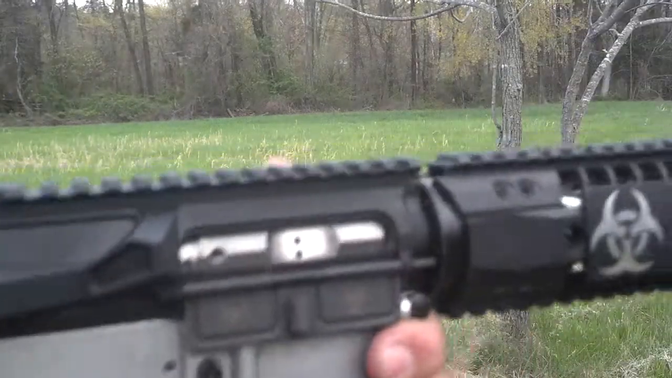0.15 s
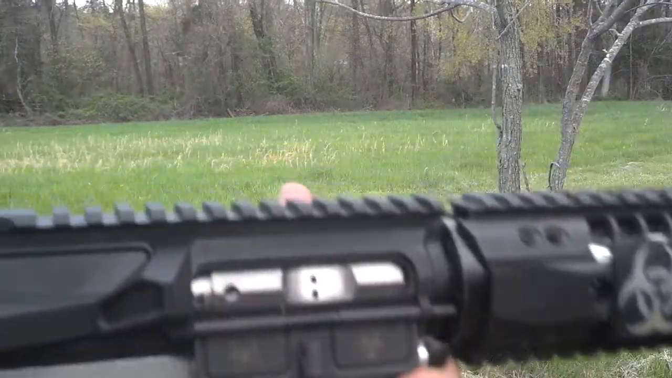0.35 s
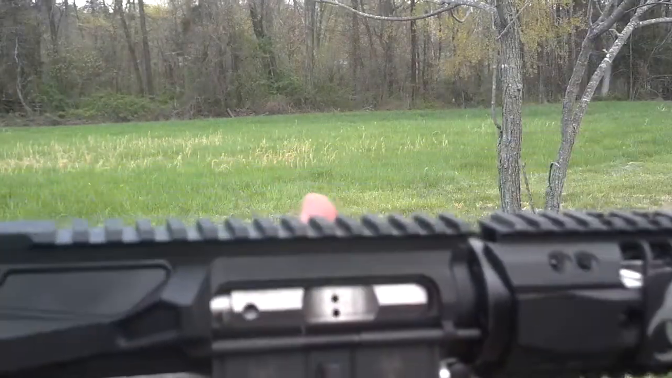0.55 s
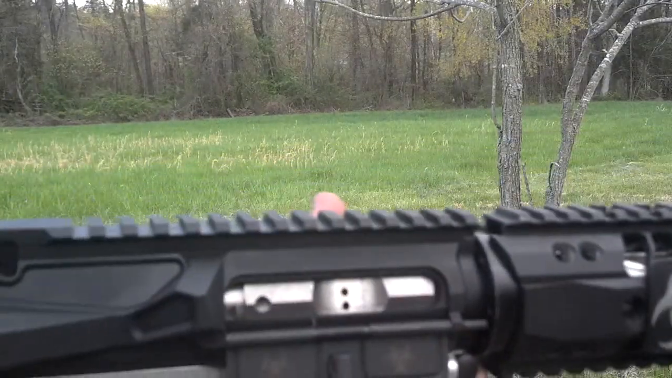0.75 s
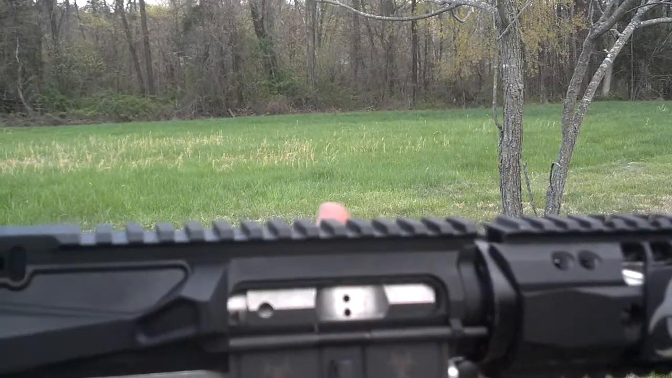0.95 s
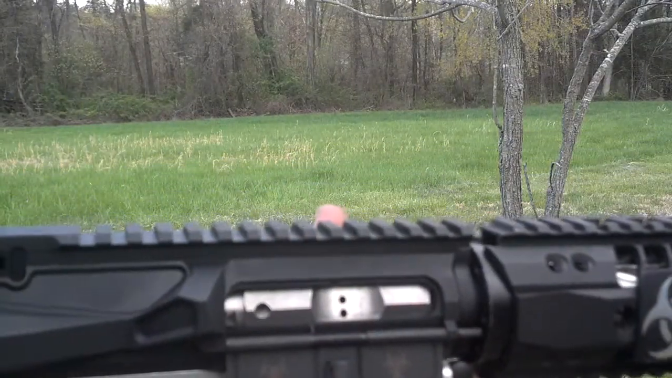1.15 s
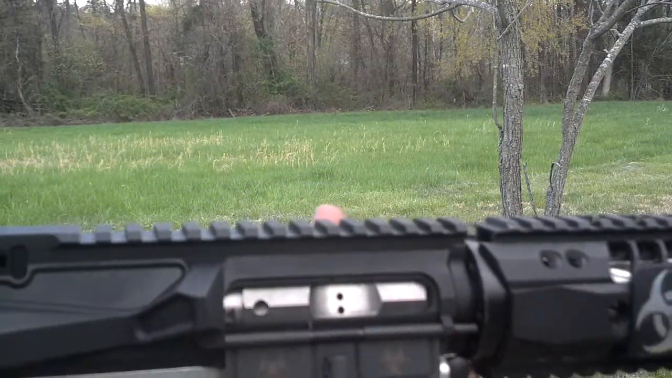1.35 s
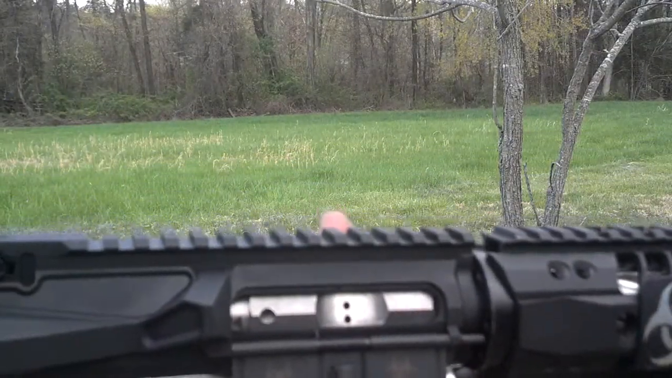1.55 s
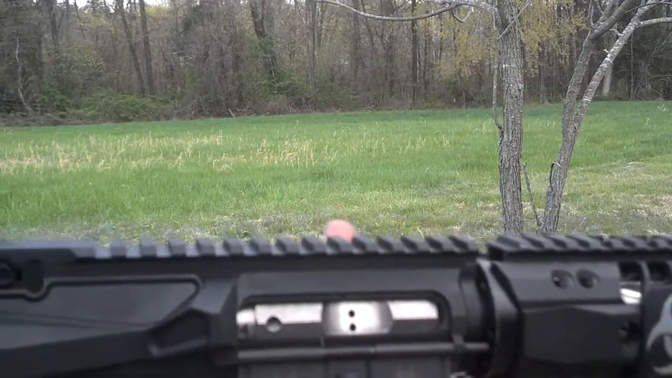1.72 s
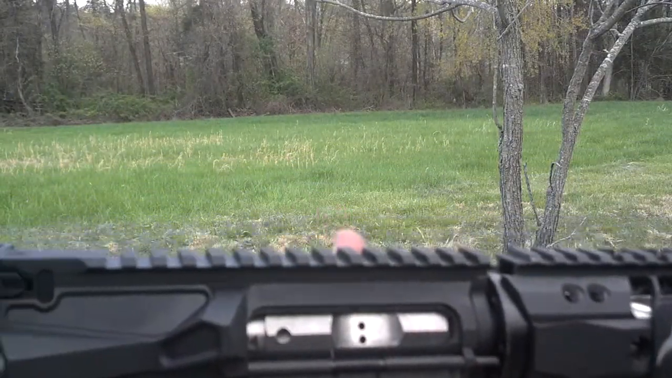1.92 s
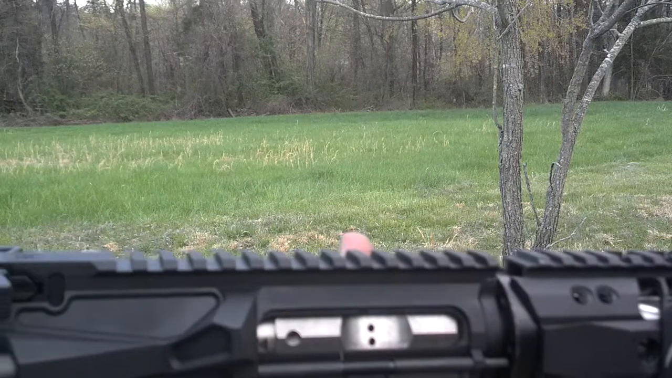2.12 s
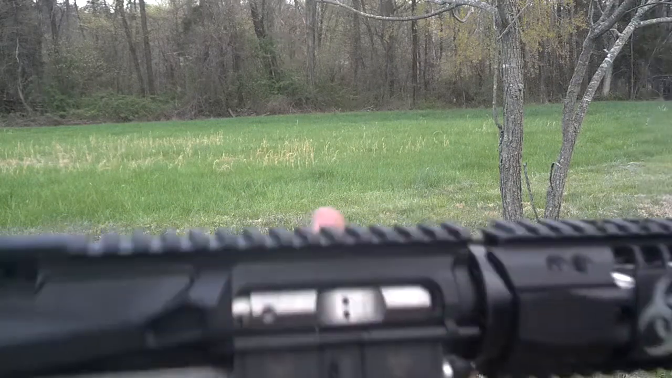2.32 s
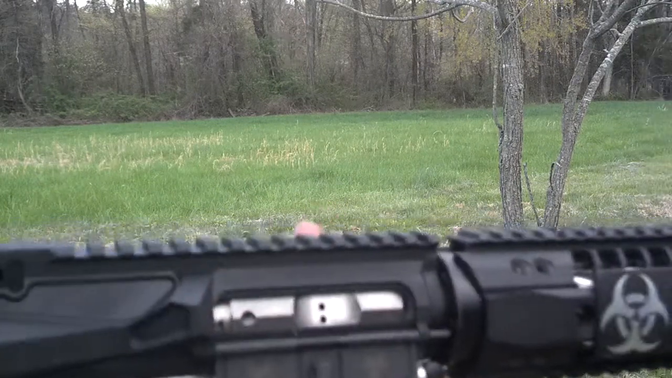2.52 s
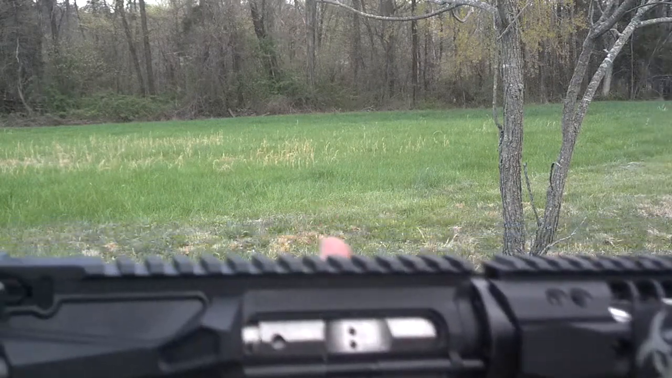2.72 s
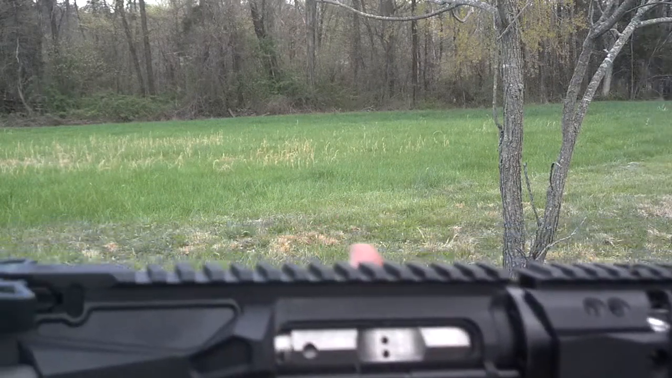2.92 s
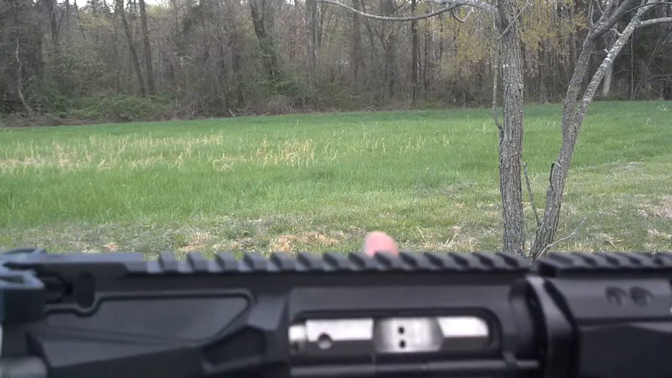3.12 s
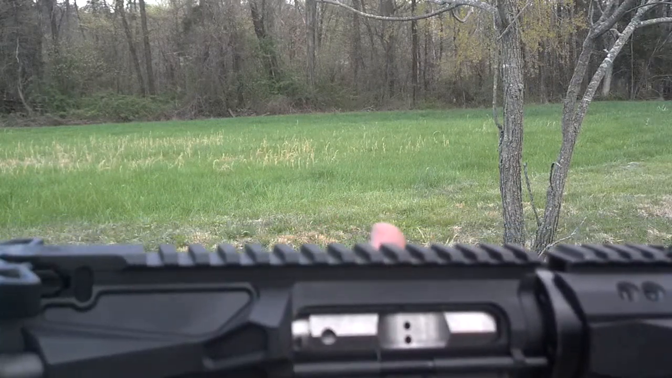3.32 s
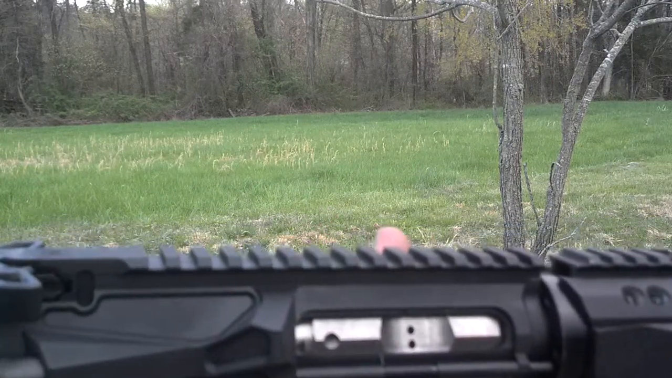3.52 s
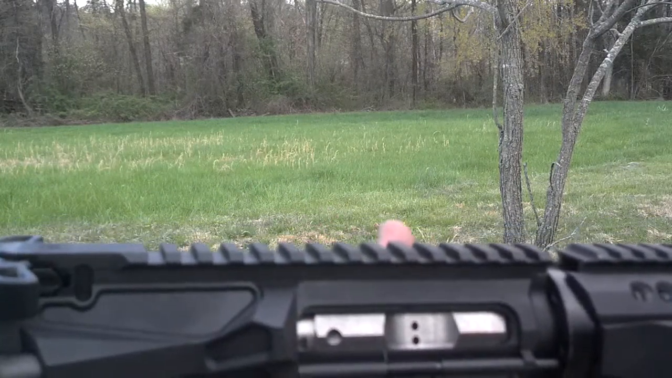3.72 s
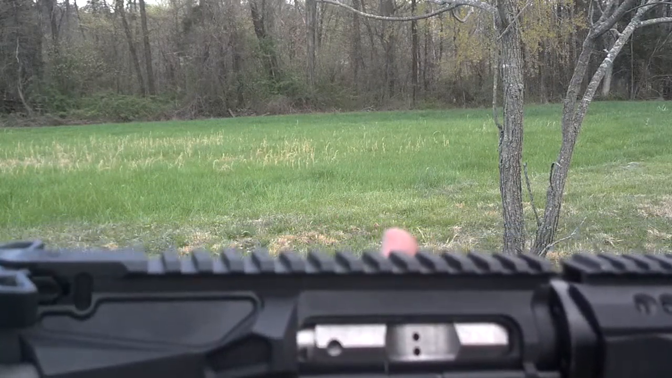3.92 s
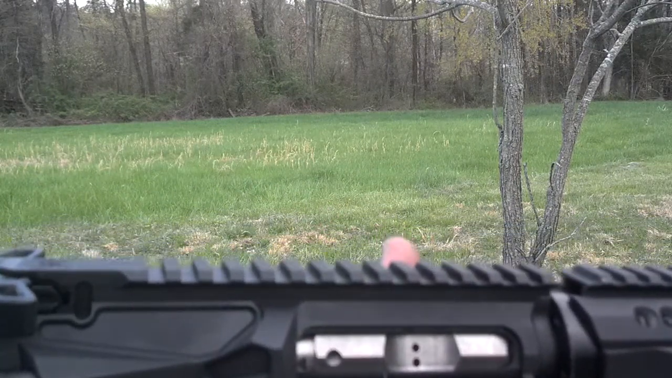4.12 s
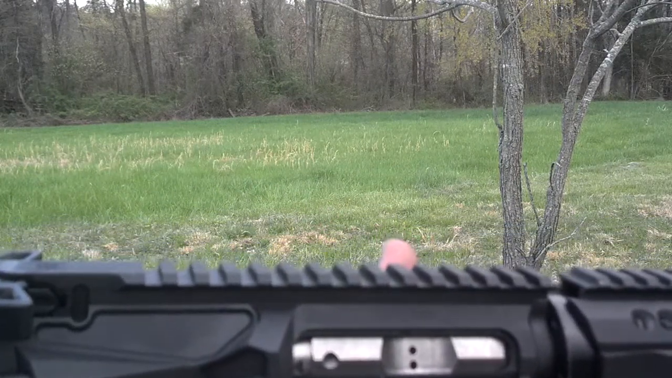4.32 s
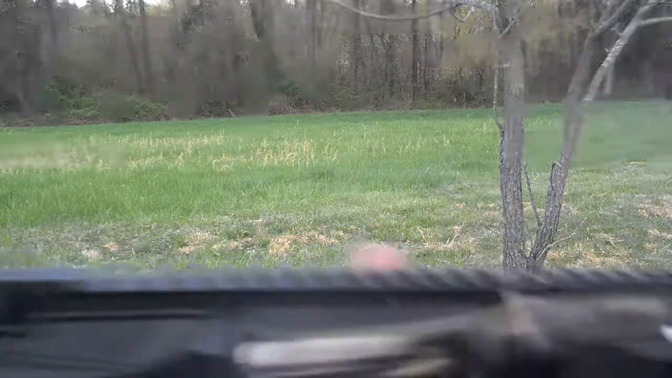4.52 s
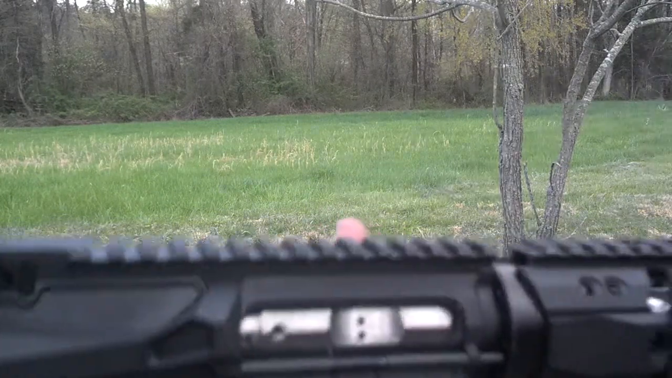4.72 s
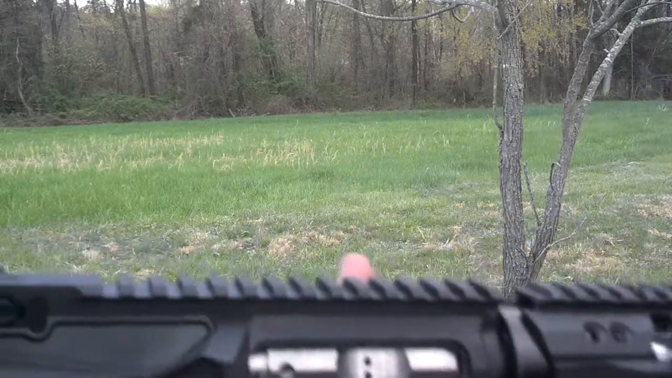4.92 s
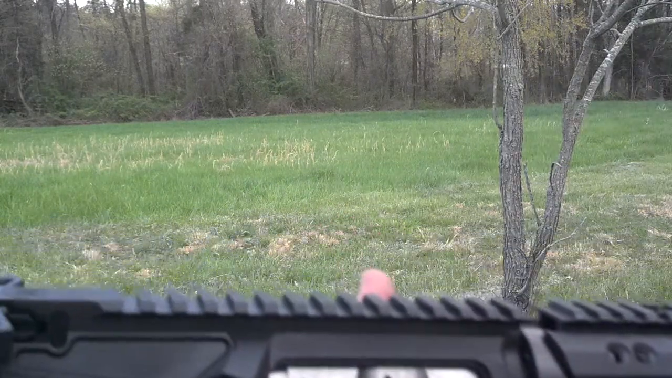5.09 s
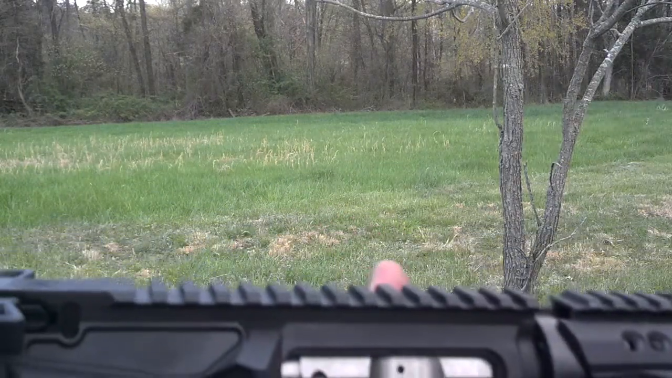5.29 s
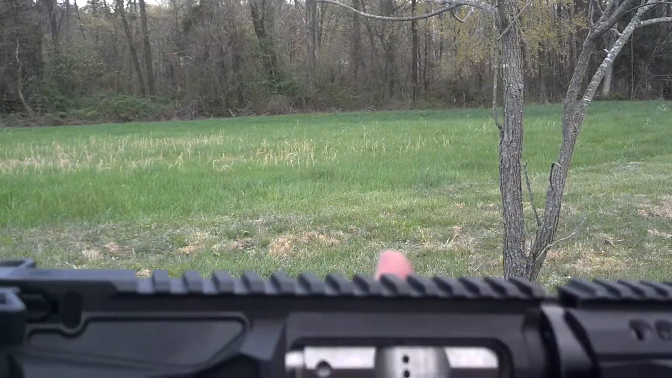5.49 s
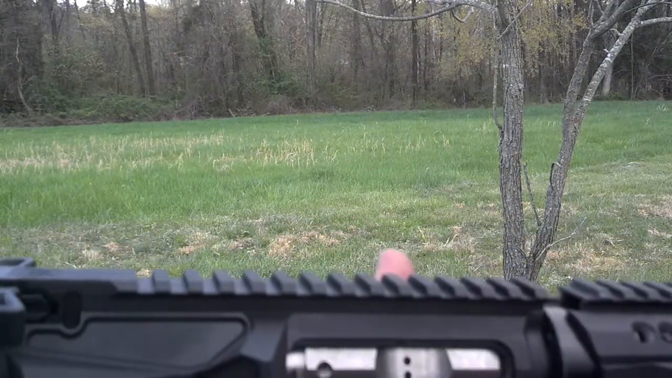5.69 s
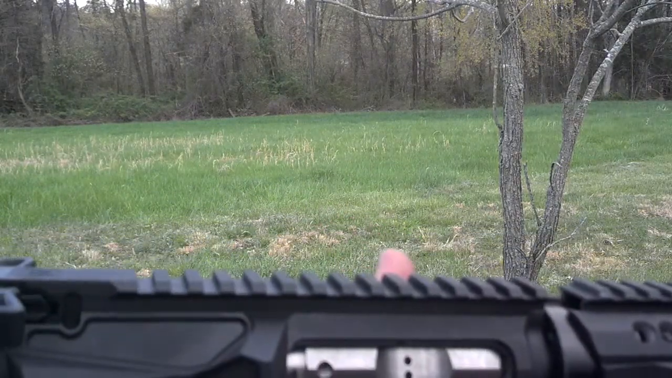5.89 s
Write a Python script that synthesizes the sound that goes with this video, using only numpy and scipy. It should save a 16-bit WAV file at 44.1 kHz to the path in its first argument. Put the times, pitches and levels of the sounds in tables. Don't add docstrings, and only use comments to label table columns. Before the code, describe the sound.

Beside a rifle at a field's edge, a small stereo camera catches a dying gunshot echo, low wind buffets mostly on the right, then two single shots a little over two seconds apart. Each has a tiny hammer tick, distorted blast, sharp metal bolt clack and tree-line echoes growing duller. A distant bird whistles faintly before the last shot.

```python
import sys
import numpy as np
from scipy import signal
from scipy.fft import rfft, irfft, next_fast_len
from scipy.io import wavfile
from scipy.ndimage import map_coordinates

SR = 44100
rng = np.random.default_rng(int(sys.argv[2]) if len(sys.argv) > 2 else 0)


def volts_from_decibels(level):
    exponent = np.asarray(level, float) / 20
    return 10 ** exponent


def dump_mix(stems):
    frames = np.atleast_2d(stems).T
    limited = np.clip(frames, -1, 1)
    pcm = np.round(limited * 32767).astype(np.int16)
    wavfile.write(sys.argv[1], SR, pcm)


N = 262395
TIME = np.arange(N) / SR
TOP_HZ = 15700


def unit(x):
    return x / np.sqrt(np.mean(x ** 2) + 1e-20)


def along(points, hz):
    f, v = np.transpose(points)
    return np.interp(np.log(hz + 1), np.log(f + 1), v)


def curves(rows, t=TIME):
    s, *cols = np.transpose(rows)
    return [np.interp(t, s, c) for c in cols]


def wobble(rate):
    knots = rng.standard_normal(int(N * rate / SR) + 4)
    return map_coordinates(knots, [TIME * rate])


def noise_pair():
    return rng.standard_normal((2, N))


def filtered(x, response):
    m = next_fast_len(N + SR // 4)
    return irfft(rfft(x, m) * response(np.fft.rfftfreq(m, 1 / SR)), m)[..., :N]


def coloured(x, colour):
    return filtered(x, lambda hz: volts_from_decibels(along(colour, hz)))


def below(hz, top_hz):
    return np.clip((top_hz - hz) / 300 + .5, 0, 1) ** 2


def at_ports(pair, colour, alike, lead):
    def mid_side(hz):
        angle = np.arccos(np.clip(along(alike, hz), -1, 1)) / 2
        return volts_from_decibels(along(colour, hz)) * [np.cos(angle), np.sin(angle)]

    mid, side = filtered(pair, mid_side)
    ramp = lambda hz: np.exp(1j * np.pi * lead * hz * np.array([[1], [-1]]))
    return filtered(np.array([mid + side, mid - side]), ramp)


def add(track, s, burst):
    i = round(s * SR)
    track[..., i:i + burst.shape[-1]] += burst[..., :N - i]


def since_shot(t):
    return t - STARTS[np.searchsorted(STARTS, t) - 1]


def after_shots(rows):
    return [(start + s, *rest) for start in STARTS for s, *rest in rows if start + s > 0]


# (time [s], strength [dB], carry of far echo [dB/s], carry of its treble [dB/s])
SHOTS = [
    (-.0897, 4.5, 1.17, 1),
    (2.239, 3.5, -1.85, -6),
    (4.5388, 3, 2.4, -1.5),
]
STARTS = np.array(SHOTS)[:, 0]
# (frequency [Hz], level [dB])
ROAR_COLOUR = [(40, -47.5), (100, 3.5), (300, -6.5), (800, -5), (1500, 0), (3000, -10), (6000, -12.5),
               (10000, -18.5), (15000, -21)]
# (frequency [Hz], level [dB])
ROLL_COLOUR = [(40, -38), (90, -7.5), (160, 4), (300, 0.5), (550, 2.5), (900, -10), (2000, -36),
               (5000, -82.5)]
# (frequency [Hz], correlation [-1..1])
NEAR_ALIKE = [(100, 0.66), (400, 0.16), (800, 0.73), (1500, 0.69), (5000, 0.23)]


def blast():
    axis_lag = -3.2e-4
    lull_s, lull_spread_s, lull_depth = .0135, .003, .55
    roar = unit(at_ports(noise_pair() * volts_from_decibels(1.5 * wobble(400)), ROAR_COLOUR, NEAR_ALIKE, axis_lag))
    roll = unit(at_ports(noise_pair(), ROLL_COLOUR, NEAR_ALIKE, axis_lag))
    roar_shape, roll_shape, fronts = np.zeros(N), np.zeros(N), np.zeros((2, N))
    u = np.arange(400) / SR / 0.0013
    front = (1 - u) * np.exp(-u) * (1 - np.exp(-4 * u)) * volts_from_decibels([[-6], [0]])
    for s, db, *_ in SHOTS:
        age = TIME - s
        tail = np.clip(age, 0, 9)
        lull = 1 - lull_depth * np.exp(-((age - lull_s) / lull_spread_s) ** 2)
        rise = volts_from_decibels(db) * np.clip(1 + age / .001, 0, 1) ** 2 * lull
        roar_shape += rise * (volts_from_decibels(-60 * np.clip(age - .064, 0, 9) / .1) + volts_from_decibels(-8 - 60 * tail / .42))
        roll_shape += rise * (volts_from_decibels(-60 * np.clip(age - .06, 0, 9) / .26) + volts_from_decibels(-26 - 60 * tail / 3.3))
        if s > 0:
            for delay, front_db in [(.0008, -8.5), (.0045, -8), (.0075, -0.5)]:
                add(fronts, s + delay, volts_from_decibels(db + front_db) * front)
    return volts_from_decibels(-22) * roar_shape * roar + volts_from_decibels(-20.5) * roll_shape * roll + fronts


# (time after shot [s], level [dB], treble left by the air [dB])
LAND = [(0, -27.5, -16.5), (.08, -24, -22), (.13, -20.5, -7.5), (.17, -31, -12), (.26, -37, -9),
        (.32, -33, -17.5), (.5, -37.5, -16), (.72, -37, -19), (1.0, -43, -23.5)]


def landscape(t):
    age = since_shot(t)
    _, _, carry_db, bright_db = np.array(SHOTS)[np.searchsorted(STARTS, t) - 1].T
    level_db, treble_db = curves(LAND, age)
    beyond = np.clip(age - LAND[-1][0], 0, None)
    carried = np.minimum(age, 0.93)
    level_db = level_db - 8 * beyond + carry_db * carried
    return level_db, np.maximum(treble_db - 23 * beyond + bright_db * carried, -38)


# (time after shot [s], level [dB], spread [s])
BANKS = [(.008, 0, 0.0035), (0.042, -8.5, 0.012), (.06, 9, .006), (0.098, -5.5, 0.0041),
         (0.111, -2.5, 0.0025), (.19, 2.5, .008), (.21, 2, 0.015), (0.322, 2.5, 0.029)]
# (frequency [Hz], level [dB])
WOODS_COLOUR = [(40, -54.5), (90, -1.5), (200, -12), (450, 3.5), (800, -2), (1300, -6.5), (2500, -13),
                (5000, -20), (10000, -38.5), (16000, -60)]
# (frequency [Hz], correlation [-1..1])
WOODS_ALIKE = [(100, 1), (500, 0.67), (750, 0.69), (1000, 0.1), (1500, -0.44), (2500, -0.084),
               (5000, 0.081)]


def echoes():
    age = since_shot(TIME)
    forest, leaves = rng.standard_normal((2, 2, N)) * volts_from_decibels(1.4 * wobble(300) + 1.2 * wobble(45))
    same = np.clip(.9 - .5 * age, 0, 1)
    crowd = same * forest[:, np.int_(age * SR)] + np.sqrt(1 - same ** 2) * leaves
    hz, t, z = signal.stft(at_ports(crowd, WOODS_COLOUR, WOODS_ALIKE, lead=-0.000043), SR, nperseg=256)
    hz = hz[:, None]
    flight = np.interp(t, TIME, np.minimum(age, 1.5))
    air_db = np.minimum(landscape(t)[1] + 16, 1) * ((hz / 4000) ** 1.46 - .15)
    air_db = air_db - 5 * flight / (1 + (hz / 420) ** 4)
    air_db = air_db - 6 * flight * (hz / 10000) ** 2
    dulled = signal.istft(z * volts_from_decibels(np.clip(air_db, -90, 12)), SR, nperseg=256)[1][:, :N]
    banks_db = sum(db * np.exp(-((age - s) / spread) ** 2) for s, db, spread in BANKS)
    gate = np.clip(age / 0.0013, 0, 1)
    return volts_from_decibels(landscape(TIME)[0] + banks_db - 2) * gate * dulled / np.std(dulled)


# (time [s], length [s], buffet level [dB])
GUSTS = [(1.097, 0.11, -61.5), (1.261, 0.307, -50), (1.597, 0.064, -53.5), (1.708, 0.21, -64),
         (2.895, 0.26, -58.5), (3.596, 0.096, -62), (3.755, 0.56, -64), (4.365, 0.082, -55),
         (5.157, 0.034, -57)]
# (time [s], peak level [dB])
THUMPS = [(.998, -25), (1.085, -25.5), (1.273, -19.5), (1.292, -25), (1.324, -24), (1.348, -25),
          (1.37, -23), (1.408, -23), (1.427, -16), (1.483, -28), (1.537, -27), (1.586, -29), (1.632, -21),
          (3.63, -32), (3.922, -31), (4.023, -27.5), (4.041, -35), (4.163, -36), (4.246, -33.5),
          (4.36, -25), (4.391, -31), (4.418, -29.5)]
# (frequency [Hz], level [dB])
BUFFET_COLOUR = [(25, -39), (60, -10.5), (110, -0.5), (170, -5.5), (300, -23.5), (600, -31.5), (1200, -74)]


def wind():
    side_db = np.interp(TIME, [2, 3], [-5, 4]) * np.array([[1], [-1]])
    lumps = volts_from_decibels(2.1 * np.array([wobble(34), wobble(31)]))
    rumble = unit(lumps * coloured(noise_pair(), BUFFET_COLOUR))
    gusts = np.zeros(N)
    for s, length, db in GUSTS:
        inside = np.minimum(TIME - s, s + length - TIME)
        gusts += volts_from_decibels(db) * np.clip(inside / 0.066 + 1, 0, 1) ** 2
    calm = volts_from_decibels(-58 - 3.5 * TIME)
    out = (gusts + calm) * volts_from_decibels(6.5 + side_db) * rumble
    eddies = filtered(noise_pair(), lambda hz: np.exp(-np.log((hz + 1) / 240) ** 2 / 0.37))
    flutter = unit(volts_from_decibels(2.9 * wobble(45)) * eddies)
    out = out + volts_from_decibels(-49 + side_db) * (gusts / volts_from_decibels(-50.5)) ** 1.53 * flutter
    t = np.arange(-600, 1200) / SR
    for (s, db), (turn, odd) in zip(THUMPS, rng.uniform(-0.8, 1, (len(THUMPS), 2))):
        hz = (165 + 6 * (db + 25.5)) * (1 + .1 * odd)
        push = np.cos(2 * np.pi * hz * t + .6 * turn) * np.exp(-(t * hz / np.where(t < 0, .27, .55)) ** 2)
        push = push - push.mean() * 2 * np.hanning(len(t))
        early = s < 2.3
        sign = 1 if early else -1
        add(out[int(early)], s + t[0], sign * volts_from_decibels(db + 2.5) * push)
    return filtered(out, lambda hz: -hz ** 2 / (110 ** 2 - hz ** 2 + 1j * hz * 100))


# (frequency [Hz], level [dB])
HISS_COLOUR = [(1000, -5), (4000, 9.5), (7000, 4), (10500, -1.5), (12500, 0.5), (14500, 4.5), (15800, 3)]


def hiss():
    return volts_from_decibels(-80) * unit(coloured(noise_pair(), HISS_COLOUR))


# (frequency [Hz], level [dB])
SCRAPE_COLOUR = [(3000, -32), (6000, -7.5), (8500, -4), (10500, -2.5), (12500, -10.5), (15000, -27.5)]


def trigger():
    swell = sum(volts_from_decibels(-80 + 25.5 * np.minimum(TIME - s, 0)) * (TIME < s) for s in STARTS)
    return swell * unit(coloured(noise_pair(), SCRAPE_COLOUR))


# (time after shot [s], peak level [dB], pitch [Hz])
TRUNKS = [(.058, -9.5, 495), (.107, -3.5, 610), (.124, -8.5, 535), (.315, -39, 750), (.416, -30, 890),
          (.56, -17, 478), (.678, -23.5, 1060), (.768, -25, 1140)]
# (time [s], peak level [dB], pitch [Hz])
STRAYS = [(.197, -20, 510), (.49, -21, 1105), (.523, -15.5, 620), (2.597, -28, 480), (5.018, -18, 657),
          (5.073, -14.5, 647), (5.174, -17.5, 550), (5.246, -20.5, 1166), (5.365, -16, 710),
          (5.724, -23, 800), (5.75, -23, 732), (5.777, -22, 689), (5.831, -22, 650)]


def slaps():
    out, t = np.zeros((2, N)), np.arange(900) / SR
    claps = after_shots(TRUNKS) + STRAYS
    for (s, db, hz), (aim, luck) in zip(claps, rng.standard_normal((len(claps), 2))):
        lag = t - 0.000051 * (1 + np.clip(aim, -1, 1) * np.array([[1], [-1]]))
        clap = np.sin(2 * np.pi * hz * lag) * volts_from_decibels(-60 * lag / 0.04) * np.clip(lag * hz * 2, 0, 1) ** 2
        add(out, s, volts_from_decibels(db - 11 + 0.65 * luck) * clap)
    return out


# (time after shot [s], peak level [dB], width [ms])
SHED = [(.1939, -14, .06)]
# (time [s], peak level [dB], width [ms])
SNAPS = [(.3262, -24, .08), (.4905, -16, .07), (4.7569, -22, .065), (5.0725, -21, .12), (5.1752, -22, .13),
         (5.725, -26, .16), (5.751, -27, .16)]


def snaps():
    out, t = np.zeros((2, N)), np.arange(-40, 300) / SR
    for s, db, width_ms in after_shots(SHED) + SNAPS:
        u = (t - np.array([[0], [1.5e-4]])) * 1e3 / width_ms
        spike = np.exp(-u ** 2) - np.exp(-((u - 4) / 3) ** 2) / 3
        add(out, s + t[0], volts_from_decibels(db) * spike * np.array([[1], [.6]]))
    return out


# (time after shot [s], level [dB], length [s], brightness [dB/octave])
CYCLE = [(.048, -25, 0.0072, 7)]
# (time [s], level [dB], length [s], brightness [dB/octave])
ACTION = [(.1275, -33, .006, 4), (.308, -44, .006, -10), (.425, -43, .0036, -11), (2.378, -28.5, .02, -1.5),
          (2.385, -31, .008, -2), (2.456, -35, .0023, -8), (2.4599, -36, .0041, 7.5),
          (4.7255, -32, .0043, 7.5), (5.019, -43, .012, -13), (5.075, -41, .011, -14)]
# (frequency [Hz], level [dB])
STEEL_COLOUR = [(100, -89), (400, -31.5), (1500, -9.5), (3500, 14), (7000, 2.5), (12000, -7), (16000, -17)]


def action():
    out, t = np.zeros((2, N)), np.arange(2048) / SR
    hz = np.fft.rfftfreq(len(t), 1 / SR)
    for s, db, length, bright_db in after_shots(CYCLE) + ACTION:
        colour = volts_from_decibels(along(STEEL_COLOUR, hz) + bright_db * np.log2((hz + 50) / 5000))
        crack = unit(irfft(rfft(rng.standard_normal((2, len(t)))) * colour))
        shape = np.exp(-(t / np.clip(length, .0005, .02)) ** 2) * (1 - np.exp(-t / 0.0002))
        add(out, s, volts_from_decibels(db) * shape * crack)
    return out


# (frequency [Hz], width [Hz], level [dB])
HAMMER_MODES = [(2000, 2000, -5), (4000, 2500, -2), (6800, 2000, -3), (10600, 1500, -2), (14800, 2500, -14)]


def hammer():
    ticks, t = np.zeros((2, N)), np.arange(-70, 330) / SR
    for s, db, *_ in SHOTS:
        if s > 0:
            shape = volts_from_decibels(-np.abs(t) * np.where(t < 0, 40000, 17000)) + volts_from_decibels(-31) * (t > 0)
            tick = rng.standard_normal(len(t)) * shape
            tick[70] = 2.5
            add(ticks, s - .009, volts_from_decibels(db - 5) * np.array([volts_from_decibels(-4) * tick, np.roll(tick, 3)]))

    def ring(f):
        total = 0
        for k, (centre, width, db) in enumerate(HAMMER_MODES):
            loss = 1j * f * width
            total = total + (-1) ** k * volts_from_decibels(db) * loss / (centre * centre - f * f + loss)
        return total

    return filtered(ticks, ring)


# (time [s], pitch [Hz], level [dB])
CALLS = [
    [(3.91, 3470, -87), (3.96, 3760, -82), (3.98, 3690, -74), (4.09, 3650, -76), (4.105, 3540, -81),
     (4.22, 3520, -83), (4.24, 3500, -94)],
    [(4.415, 3520, -78), (4.445, 3740, -74), (4.475, 3760, -69), (4.54, 3780, -71)],
]


def bird():
    out = np.zeros(N)
    for rows in CALLS:
        hz, db = curves(rows)
        on = np.clip(np.minimum(TIME - rows[0][0], rows[-1][0] - TIME) / .01, 0, 1)
        phase = 2 * np.pi * np.cumsum(hz + 18 * wobble(60)) / SR
        out += on * volts_from_decibels(db - 1 + 3.5 * wobble(60)) * np.sin(phase)
    hang = unit(filtered(rng.standard_normal(N), lambda hz: np.exp(-((hz - 3780) / 110) ** 2)))
    held = TIME - 3.96
    out += hang * volts_from_decibels(-78 - 24 * held) * np.clip(held / .02, 0, 1)
    t = np.arange(SR // 3) / SR
    trees = rng.standard_normal(len(t)) * volts_from_decibels(-60 * t / .7)
    out = out + volts_from_decibels(-6) * signal.fftconvolve(out, trees / np.linalg.norm(trees))[:N]
    return out * volts_from_decibels([[1.5], [-2.5]])


def scene():
    shot = blast() + echoes() + slaps() + snaps() + action()
    field = shot + wind() + hiss() + trigger() + bird()
    return filtered(field, lambda hz: below(hz, TOP_HZ)) + hammer()


PORT_LAG = 16


def hollow(pair):
    def keep(hz):
        turn = np.pi * hz * PORT_LAG / SR
        depth = np.abs([np.sin(turn), np.cos(turn)])
        return np.clip(depth / (.2 + hz / 90000) + (hz < 900), 0, 1) ** 2

    mid, side = filtered(np.array([pair[0] + pair[1], pair[0] - pair[1]]) / 2, keep)
    return np.array([mid + side, mid - side])


def top_cut(x):
    return signal.sosfilt(signal.butter(12, 16810, fs=SR, output="sos"), x)


def record(dry):
    ports = dry / (1 + np.abs(dry / 0.68) ** 4) ** (1 / 4)
    other = np.pad(ports[::-1], ((0, 0), (PORT_LAG, 0)))[:, :N]
    top = lambda hz: np.maximum(below(hz, TOP_HZ), volts_from_decibels(-7.5) * below(hz, 16900))
    wide = filtered(hollow(ports - other), top)
    return top_cut(wide)


dry = scene()
out = record(dry)
dump_mix(out)
```